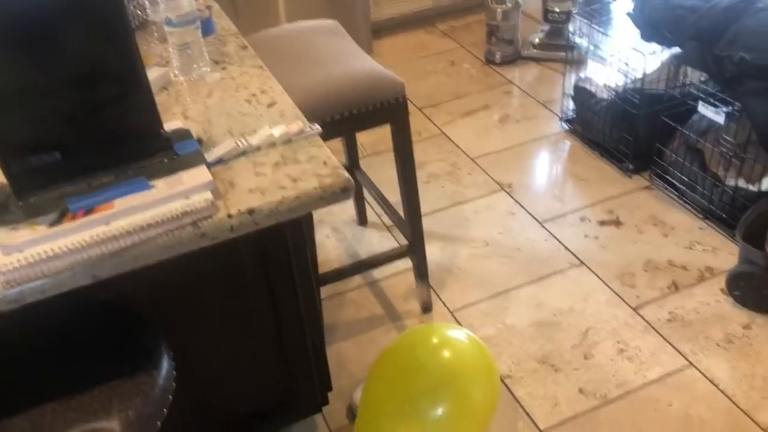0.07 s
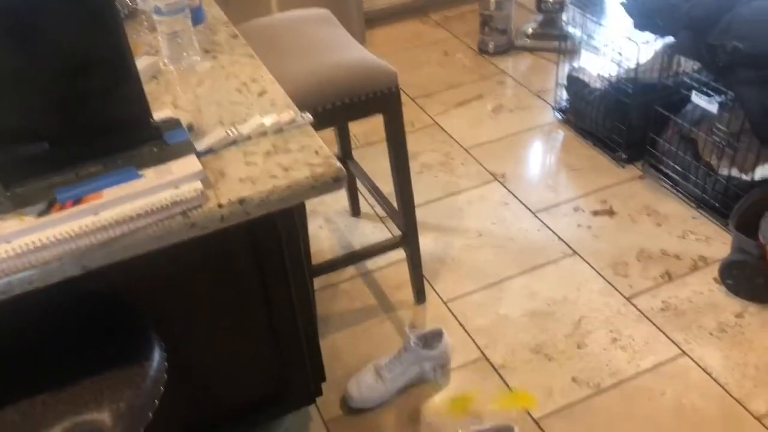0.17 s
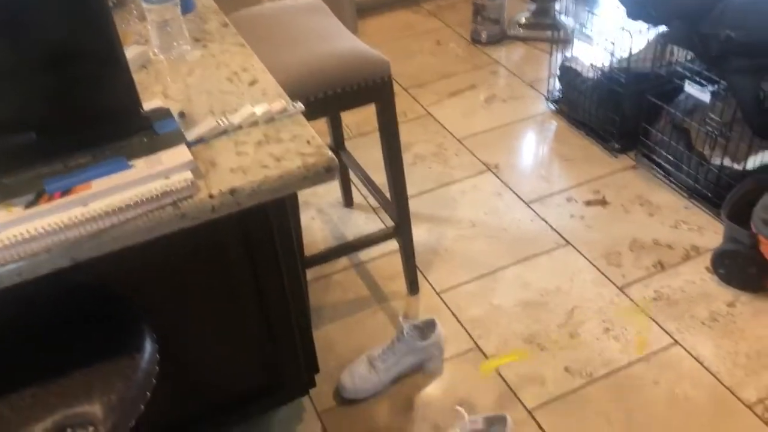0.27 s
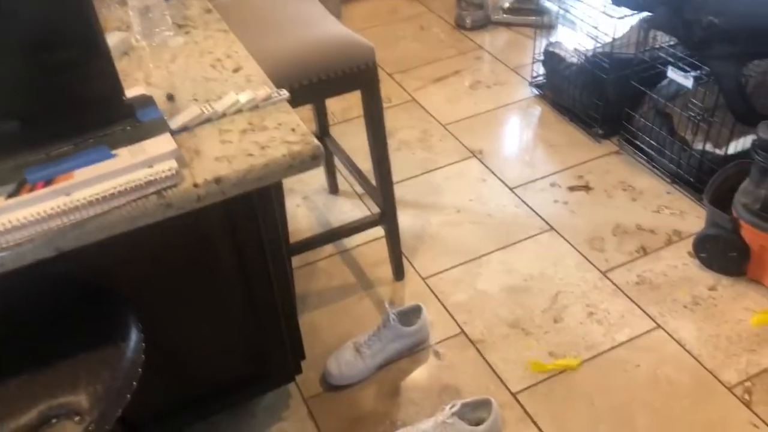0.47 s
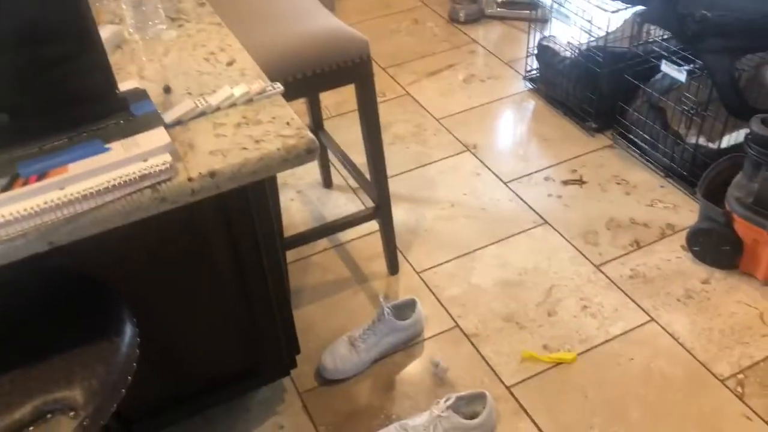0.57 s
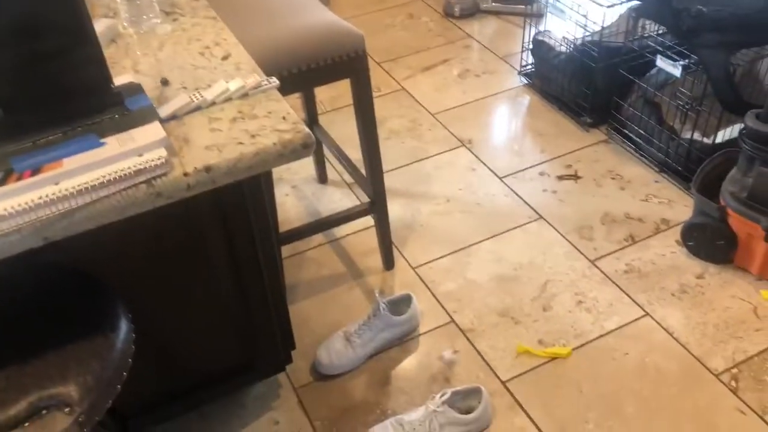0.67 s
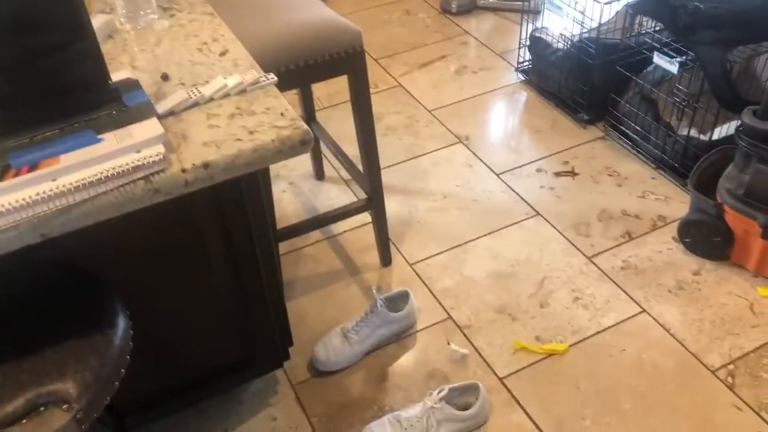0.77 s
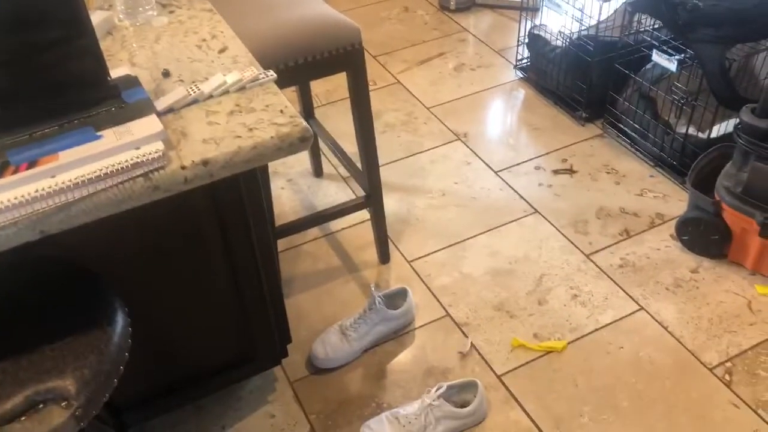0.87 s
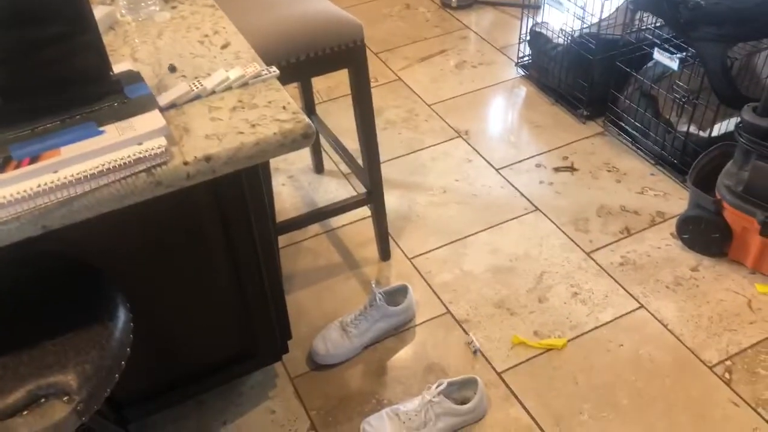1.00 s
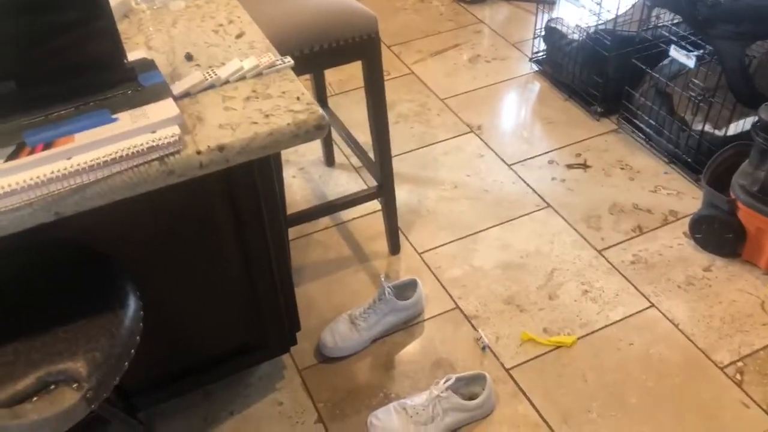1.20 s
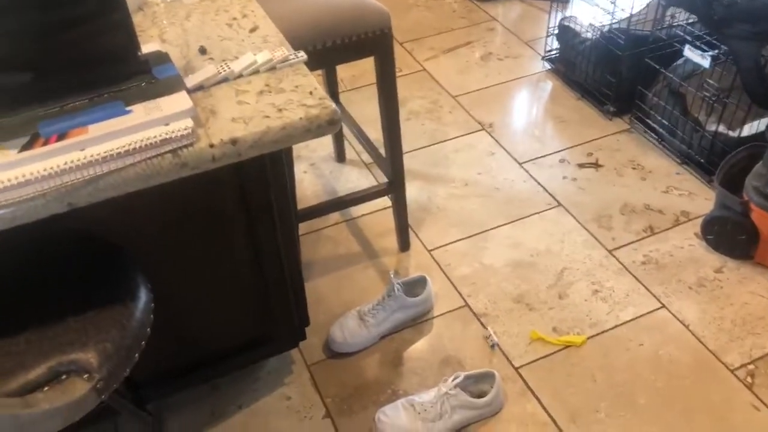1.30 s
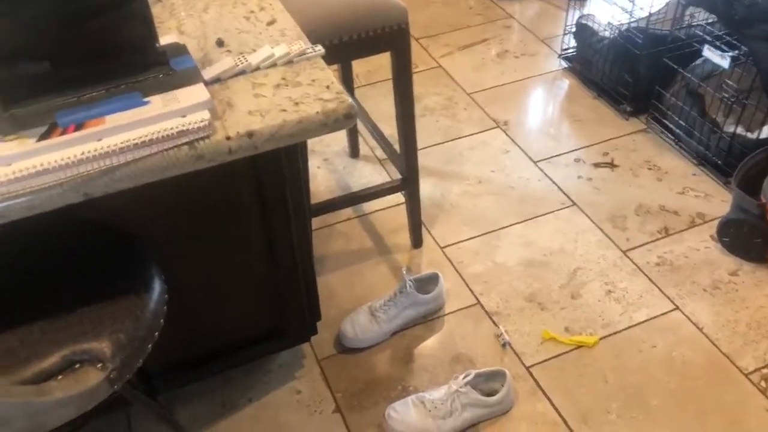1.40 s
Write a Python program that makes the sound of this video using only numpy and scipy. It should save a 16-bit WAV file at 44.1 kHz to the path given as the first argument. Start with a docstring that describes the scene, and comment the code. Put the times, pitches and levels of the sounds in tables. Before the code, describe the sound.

A balloon bursts with one sharp bang that echoes briefly in a tiled kitchen. A small hard piece then bounces on the floor with light, ringing clicks, and faint ticks quicken and stop, picked up by a phone.

```python
"""A tiled kitchen, in which a balloon bursts. A bright ring is already fading when the skin tears, the
freed air oscillates, the rubber snaps and the room reverberates. A phone's gain control ducks the bang
and lets the echo swell back. A small hard piece then bounces on the tiles, each impact exciting its
modes, while something light ticks ever faster as it rocks to rest."""
import sys
import numpy as np
from scipy import signal
from scipy.fft import rfft, irfft
from scipy.io import wavfile
from scipy.ndimage import uniform_filter1d, minimum_filter1d

SR = 44100
rng = np.random.default_rng(int(sys.argv[2]) if len(sys.argv) > 2 else 0)


def write(x):
    x = np.atleast_2d(x).T
    wavfile.write(sys.argv[1], SR, np.round(np.clip(x, -1, 1) * 32767).astype(np.int16))


N = 63945

# Spectra of the fading ring, the room's steady noise and the low bumps: frequency_hz, level_db
FADING_RING_SPECTRUM = [(30, -17), (100, 0), (400, -12), (700, -3.5), (2500, -11), (5200, -4), (6150, -4),
                        (6500, 9), (6900, -2), (7400, -1), (8500, -11.5), (13500, -16), (14850, -6),
                        (16000, -27.5)]
AMBIENT_SPECTRUM = [(30, -15.5), (60, -10), (120, 1.5), (250, -7.5), (500, -4.5), (1000, 0.5), (2000, -1),
                    (4000, -5), (8000, -15.5), (16000, -18)]
BUMP_SPECTRUM = [(30, -6.5), (70, -4), (120, 4), (250, -13), (600, -43.5), (4000, -67)]
# Soft low bumps: start_s, level_db, decay_s
BUMPS = [(0.112, -61, 0.19), (1.171, -66.5, 0.014), (1.389, -69, 0.033)]
# Rips in the rubber skin: start_s, level_db, decay_s
RIPS = [(.2092, -7, .0012), (.2122, -8, 0.0016), (.2316, 3.3, .0033), (0.2339, 1.5, 0.0019)]
# Spectra of the skin tearing and flapping: frequency_hz, level_db
RIP_SPECTRUM = [(30, -25.5), (150, -12), (500, -10), (1300, -17), (2100, -9.5), (3200, 2.5), (4400, -7),
                (7500, -11.5), (11000, -15), (14000, -11.5), (16000, -14)]
FLUTTER_SPECTRUM = [(50, -21.5), (250, 11), (750, 5), (1200, -14), (1700, 7.5), (2300, -20), (3000, 5),
                    (5000, -43), (16000, -32.5)]
# Reverberation time of the kitchen: frequency_hz, t60_s
ROOM_T60 = [(60, 0.39), (200, 0.45), (600, 0.44), (1500, 0.48), (3600, 0.45), (6000, 0.41), (9000, 0.33),
            (15000, 0.22)]
# Spectra of the reverberation of the bang and of the small sounds: frequency_hz, level_db
BANG_REVERB_SPECTRUM = [(25, -27.5), (60, -24), (110, -8), (185, 5), (450, 3.5), (680, 2), (1100, -8),
                        (2200, -6), (3600, 0), (4500, -6), (7000, -11), (10000, -12.5), (15500, -16.5)]
TAP_REVERB_SPECTRUM = [(30, -39), (120, -10), (240, -1.5), (450, -8), (800, -5.5), (1600, -1), (3500, -2),
                       (5500, -1.5), (7500, -5), (9000, -12), (16000, -11.5)]
# Ticks of the rocking object: start_s, level_db
TICKS = [(0.536, -56), (0.609, -56), (.634, -50), (0.799, -55.5), (.858, -56), (.909, -58), (0.961, -71),
         (1.056, -74), (1.103, -55), (1.149, -53.5), (1.192, -55), (1.234, -54), (1.275, -54),
         (1.313, -54.5), (1.347, -54), (1.378, -56)]
# Spectrum of a tick: frequency_hz, level_db
TICK_SPECTRUM = [(200, -19), (900, -3), (3000, 2), (7000, -6), (15000, -7.5)]
# Impacts of the hard piece: start_s, level_db, treble_db, echo_db, ring_db
IMPACTS = [(.6678, -27, 1, 1, -1), (.8172, -31, -13, -1, -12), (0.9287, -31, -9, -3, -4),
           (0.9459, -34.5, -0.5, -3, -2), (1.007, -34.5, -9, -1, -3), (1.016, -40, -3, 0, 0),
           (1.0587, -45, -1, -1, 1)]
# Spectra of an impact's body and of its treble edge: frequency_hz, level_db
BODY_SPECTRUM = [(30, -43), (150, -35), (450, -34), (800, -6), (2000, -6), (3400, 3), (5000, -7),
                 (9000, -33), (16000, -30)]
EDGE_SPECTRUM = [(100, -63), (2000, -44), (4500, -23), (5600, 3.5), (6700, 11), (7800, 2.5), (9000, -6),
                 (16000, -18)]
# Modes of the hard piece: pitch_hz, level_db, t60_s
PIECE_MODES = [(6720, -26, 0.37), (7620, -25, .33)]


def undb(db):
    """Amplitude ratio of a level in decibels."""
    return 10 ** (np.asarray(db) / 20)


def clock():
    """Time in seconds."""
    return np.arange(N) / SR


def magnitude(spectrum, size):
    """Amplitude in each Fourier bin, with level interpolated over log frequency."""
    points = np.array(spectrum)
    hz = np.maximum(np.fft.rfftfreq(size, 1 / SR), 1)
    return undb(np.interp(np.log(hz), np.log(points[:, 0]), points[:, 1]))


def noise(spectrum):
    """Spectral shaping: white noise filtered to a spectrum and scaled to unit rms."""
    shaped = irfft(rfft(rng.standard_normal(N)) * magnitude(spectrum, N), N)
    return shaped / shaped.std()


def click(spectrum):
    """Minimum phase: a pulse of unit energy, as front-loaded as its spectrum allows."""
    cepstrum = irfft(np.log(magnitude(spectrum, 1024)))
    cepstrum[len(cepstrum) // 2:] = 0
    pulse = irfft(np.exp(2 * rfft(cepstrum)))
    return np.pad(pulse / np.sqrt(np.sum(pulse ** 2)), (0, N - len(pulse)))


def burst(start_s, decay_s, rise_s=.0004):
    """Transient envelope: a linear attack, then exponential decay."""
    age = clock() - start_s
    return np.clip(age / rise_s, 0, 1) * np.exp(-np.maximum(age - rise_s, 0) / decay_s)


def reverberation_time(hz):
    """Seconds in which the kitchen's sound falls by 60 dB at each frequency."""
    room = np.array(ROOM_T60)
    return np.interp(np.log(hz + 1), np.log(room[:, 0]), room[:, 1])


def fading_ring(t60_ratio=1.3):
    """Free decay: each band of a bright ring dies away a little more slowly than the room does."""
    hz, t, bands = signal.stft(noise(FADING_RING_SPECTRUM), SR, nperseg=256)
    decay = undb(-60 * t / (t60_ratio * reverberation_time(hz))[:, None])
    return signal.istft(bands * decay, SR)[1][:N]


def low_bumps():
    """Amplitude modulation: gentle onsets shape low noise into soft bumps."""
    envelope = sum(undb(db) * burst(start, decay, rise_s=.01) for start, db, decay in BUMPS)
    return noise(BUMP_SPECTRUM) * envelope


def tearing_skin():
    """Fracture: each rip in the stretched rubber radiates a brief burst of noise."""
    return noise(RIP_SPECTRUM) * sum(undb(db) * burst(start, decay) for start, db, decay in RIPS)


def freed_air(start_s=.2095, peak_s=.227, pitch_hz=433, swell_s=.0024, decay_s=.0036):
    """Damped oscillation: the released air swings, swelling and dying as the skin flaps."""
    t = clock()
    age = t - peak_s
    onset = np.clip((t - start_s) * pitch_hz, 0, 1)
    swell, leak = np.exp(np.minimum(age, 0) / swell_s), undb(-24.5)
    envelope = onset * (swell + leak) * np.exp(-np.maximum(age, 0) / decay_s)
    wobble = .11 * noise([(200, 0), (600, -53)])
    cycles = np.cumsum(pitch_hz * (1 + wobble)) / SR
    swing = np.cos(2 * np.pi * (cycles - np.interp(peak_s, t, cycles)))
    flutter = undb(-11.5) * noise(FLUTTER_SPECTRUM)
    return undb(11) * envelope * (swing + flutter)


def collapsing_skin(peak_s=.2312, width_s=.00038, boom_hz=283.8):
    """Rarefaction: the collapse makes one negative pressure pulse and a damped boom."""
    age, period_s = clock() - peak_s, 1 / boom_hz
    thump = undb(9) * np.exp(-(age / width_s) ** 2)
    envelope = burst(peak_s - period_s, decay_s=.009, rise_s=period_s)
    boom = undb(1) * envelope * np.cos(2 * np.pi * boom_hz * age)
    return -thump - boom


def reverberation(source, spectrum, delay_s=.004, early_decay_s=.0077):
    """Diffuse field: the room stores sound energy and returns it as a wash, treble fading first."""
    hz, t, wash = signal.stft(noise(spectrum), SR, nperseg=128)
    power = np.interp(t - delay_s, clock(), uniform_filter1d(source ** 2, size=64))
    early = undb(-6) ** 2 * np.exp(-t / early_decay_s)
    late = undb(-60 * t / reverberation_time(hz)[:, None]) ** 2
    decay = early + late
    stored = signal.fftconvolve(power[None], decay / decay[0].sum(), axes=1)[:, :len(t)]
    return signal.istft(wash * np.sqrt(np.maximum(stored, 0)), SR)[1][:N]


def ceiling_reflection(source, delay_s=.0142):
    """Specular reflection: the longer path by the ceiling brings a later, weaker copy."""
    return undb(-12.5) * np.interp(clock() - delay_s, clock(), source, left=0)


def rocking_object():
    """Contact noise: faint scratchy ticks crowd together as a light object rocks to rest."""
    envelope = sum(undb(db) * burst(start, decay_s=.006, rise_s=.002) for start, db in TICKS)
    return noise(TICK_SPECTRUM) * envelope


def bouncing_piece(waver_hz=110):
    """Impact excitation: each landing clicks, rattles and rings. Returns the sound and its room feed."""
    body_noise, edge_noise = noise(BODY_SPECTRUM), noise(EDGE_SPECTRUM)
    body_click, edge_click = click(BODY_SPECTRUM), click(EDGE_SPECTRUM)
    waver = [(waver_hz, 0), (4 * waver_hz, -40)]  # the ring wavers as the piece spins
    modes = [(undb(db) * noise(waver) * np.sin(2 * np.pi * hz * clock()), t60 / np.log(1000))
             for hz, db, t60 in PIECE_MODES]
    direct = room_feed = 0
    for start_s, level_db, treble_db, echo_db, ring_db in IMPACTS:
        contact = undb(8) * np.roll(body_click + undb(treble_db) * edge_click, int(start_s * SR))
        rattle = undb(-6) * burst(start_s, decay_s=.001) * (body_noise + undb(treble_db) * edge_noise)
        ring = sum(tone * burst(start_s, decay_s) for tone, decay_s in modes)
        direct += undb(level_db) * (contact + rattle + undb(ring_db) * ring)
        room_feed += undb(level_db + echo_db) * (contact + rattle)
    return direct, room_feed


def scene():
    """Superposition: direct sound, ceiling reflection and reverberation add to a quiet background."""
    bang = tearing_skin() + freed_air() + collapsing_skin()
    taps, tap_feed = bouncing_piece()
    ticks = rocking_object()
    direct = bang + taps + ticks
    wash = undb(-4) * reverberation(bang, BANG_REVERB_SPECTRUM)
    wash += reverberation(tap_feed + undb(-4) * ticks, TAP_REVERB_SPECTRUM)
    background = low_bumps() + undb(-41) * fading_ring() + undb(-65) * noise(AMBIENT_SPECTRUM)
    return (direct + ceiling_reflection(direct) + wash + background)[None]


def gain_control(sound, limit_db=-10, lookahead_s=.022, hold_s=.05, release_db_per_s=151.5):
    """Limiting: the gain drops just ahead of a loud sound, holds, then climbs back steadily."""
    power = uniform_filter1d(sound ** 2, size=400)
    excess_db = np.maximum(10 * np.log10(np.maximum(power, 1e-12)) - limit_db, 0)
    ahead, hold = int(lookahead_s * SR), int(hold_s * SR)
    held_db = -minimum_filter1d(-excess_db, ahead + hold, origin=(hold - ahead) // 2)
    climb_db = release_db_per_s * clock()
    reduction_db = np.maximum.accumulate(held_db + climb_db) - climb_db
    return sound * undb(-uniform_filter1d(reduction_db, size=300))


def record(dry, cutoff_hz=16000):
    """Saturation and band limiting: after its gain control the phone rounds peaks and cuts the top."""
    rounded = np.tanh(gain_control(dry[0]))
    lowpass = signal.ellip(8, .2, 80, cutoff_hz, fs=SR, output="sos")
    return signal.sosfilt(lowpass, rounded)[None]


dry = scene()
out = record(dry)
write(out)
```